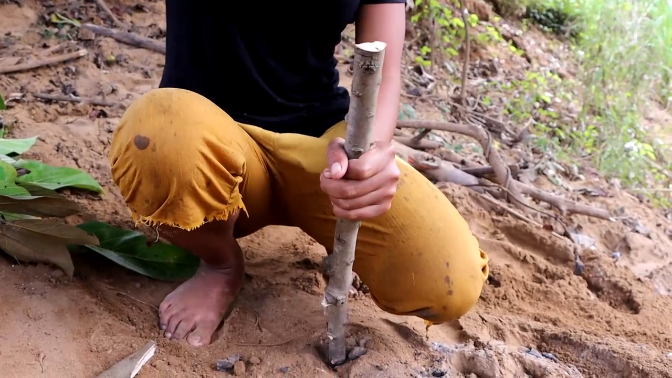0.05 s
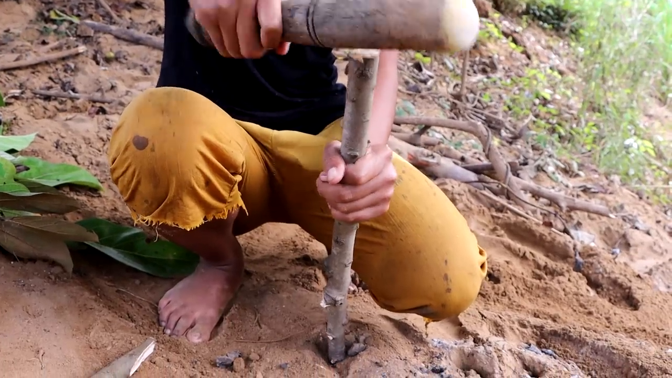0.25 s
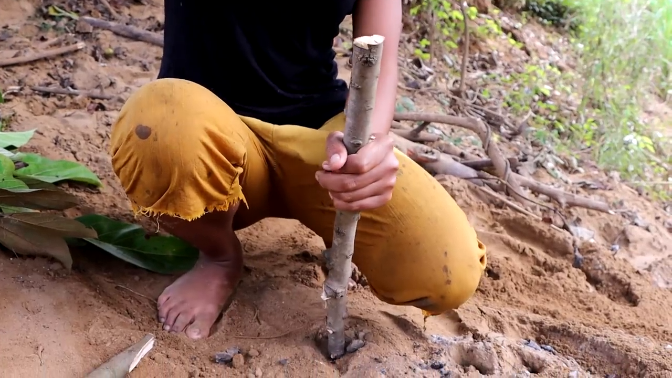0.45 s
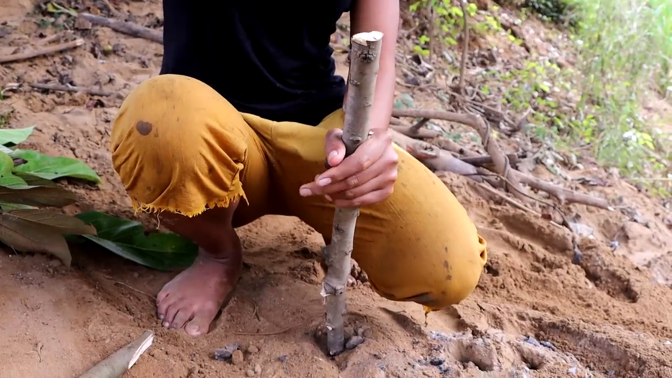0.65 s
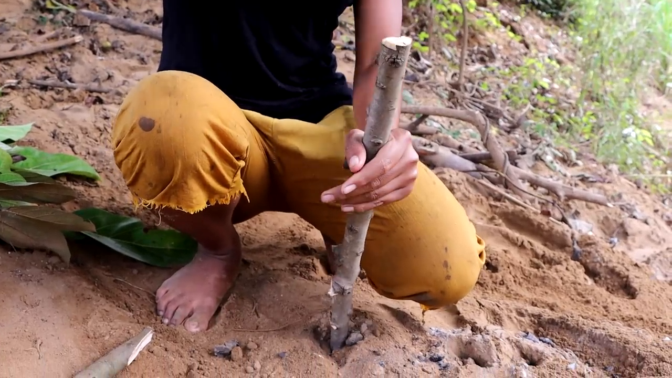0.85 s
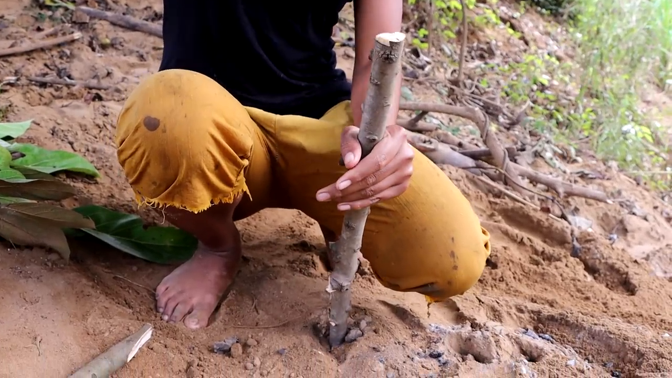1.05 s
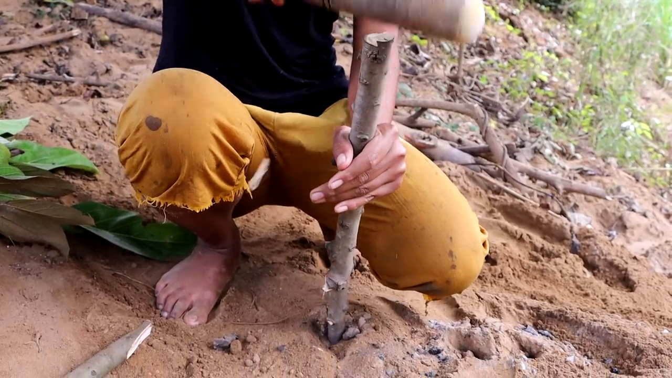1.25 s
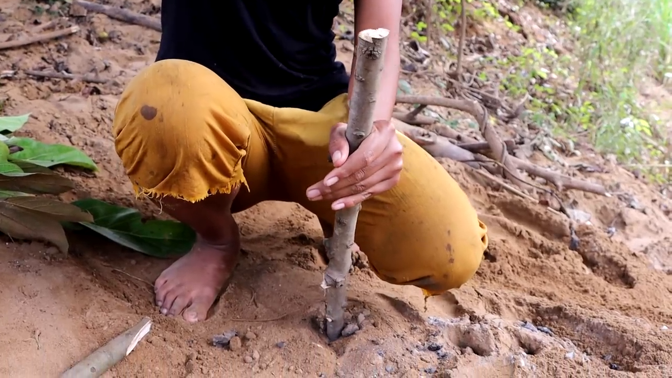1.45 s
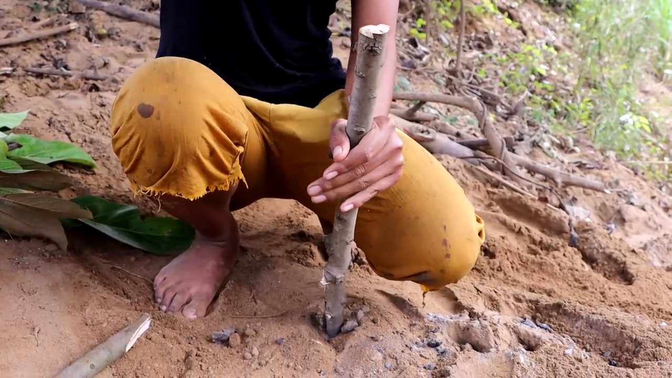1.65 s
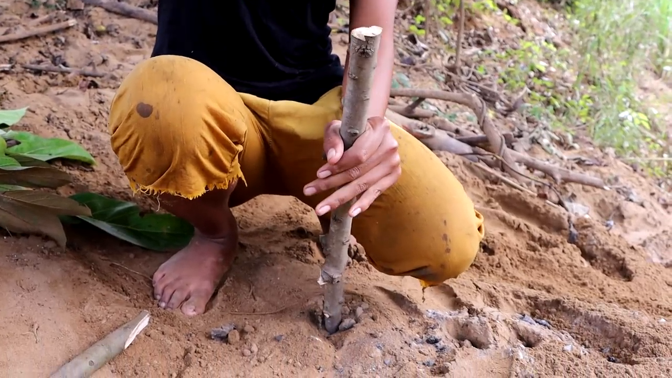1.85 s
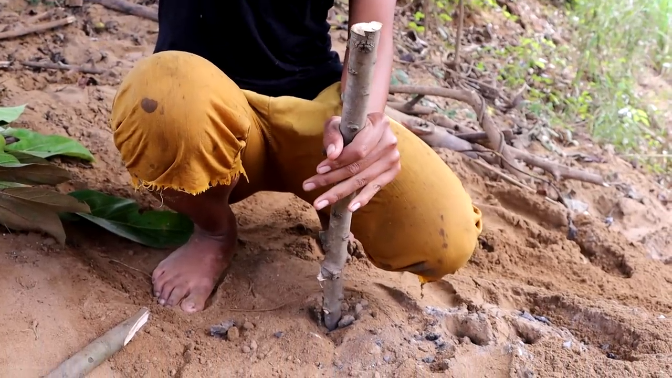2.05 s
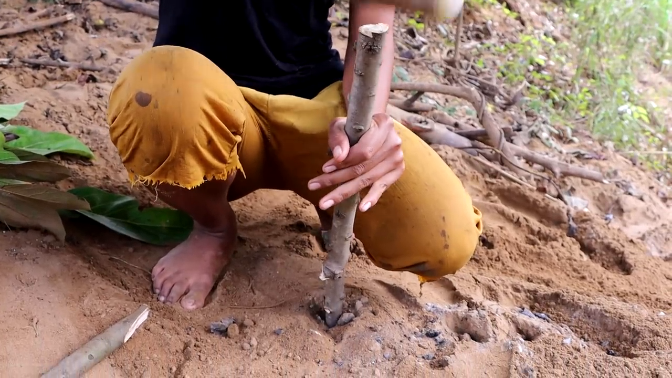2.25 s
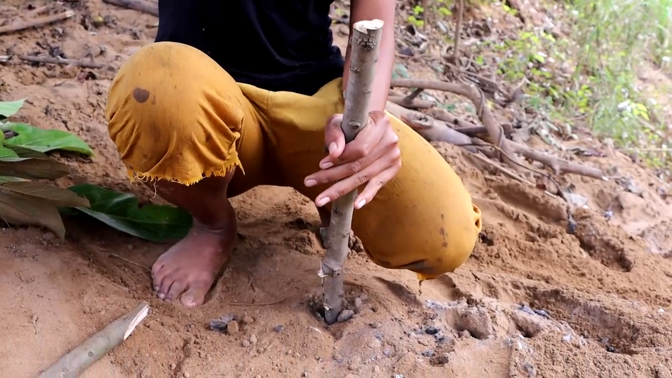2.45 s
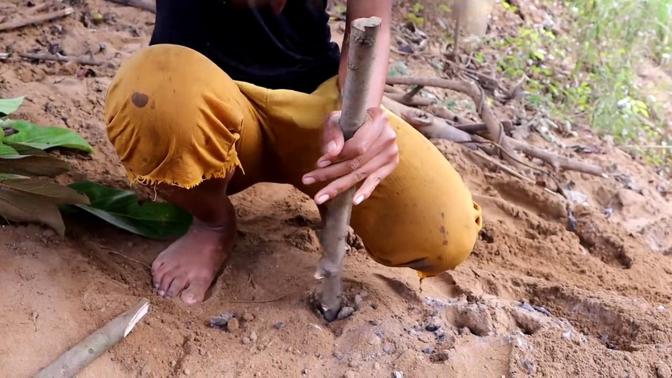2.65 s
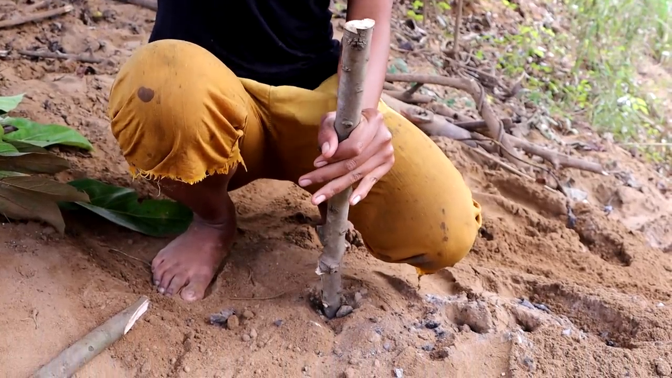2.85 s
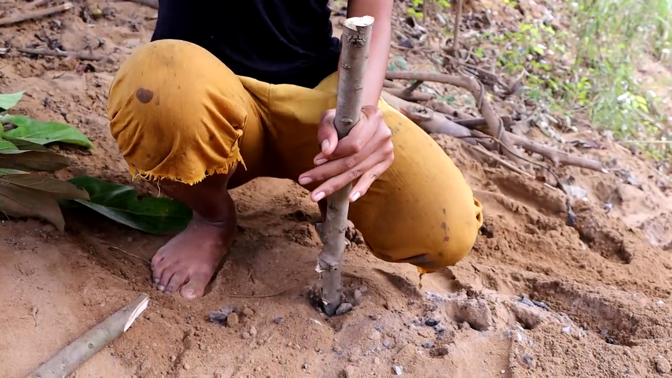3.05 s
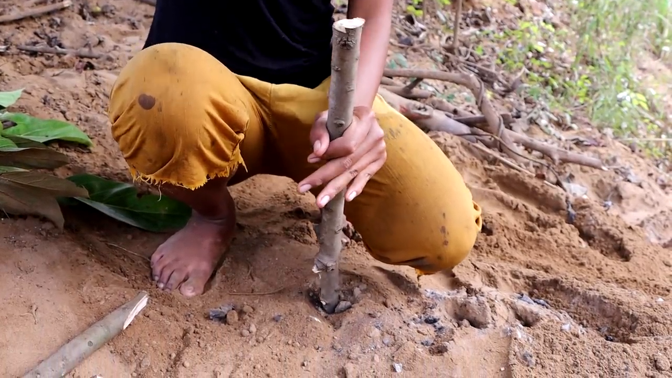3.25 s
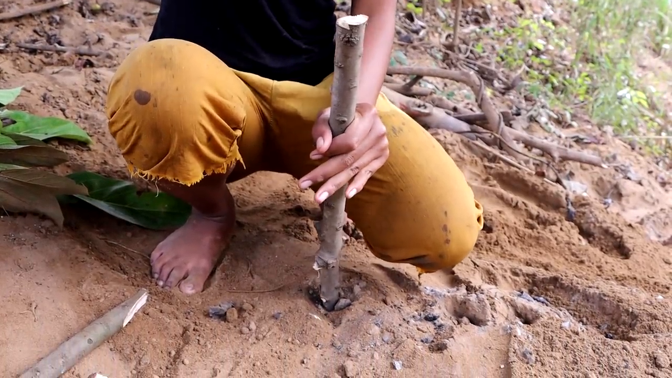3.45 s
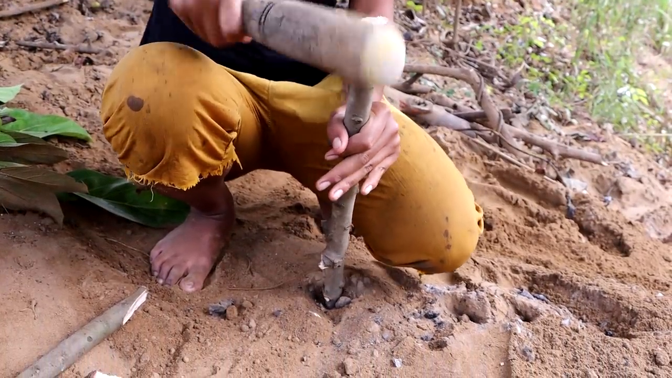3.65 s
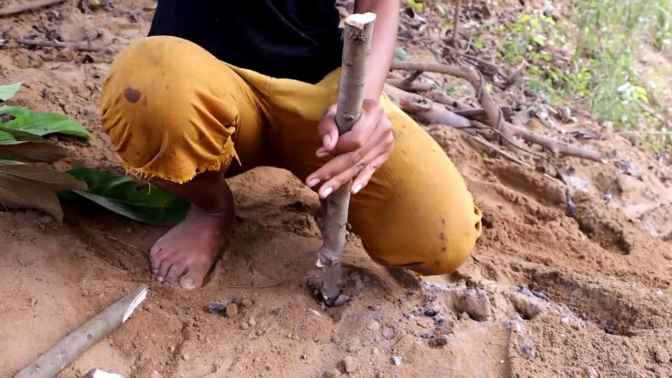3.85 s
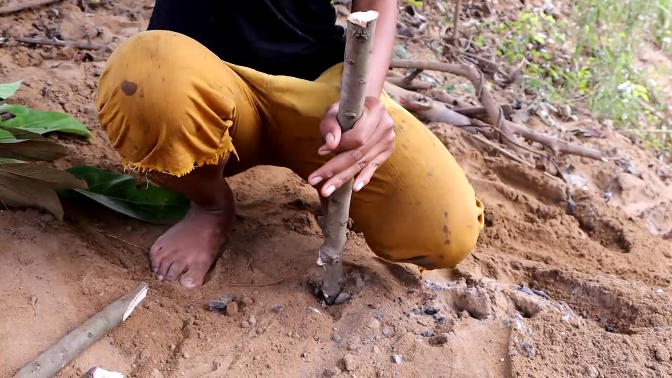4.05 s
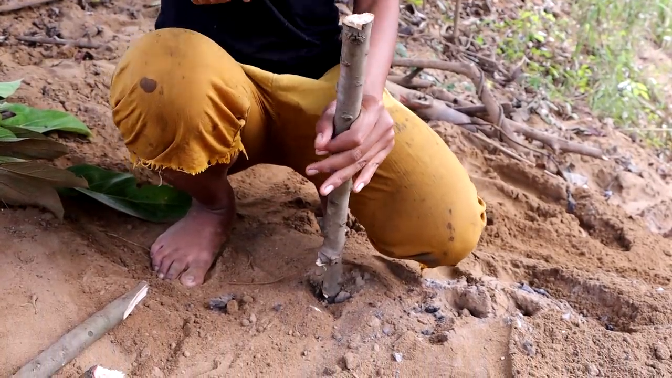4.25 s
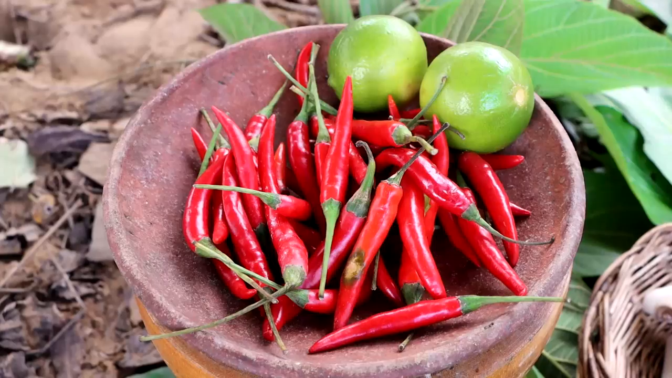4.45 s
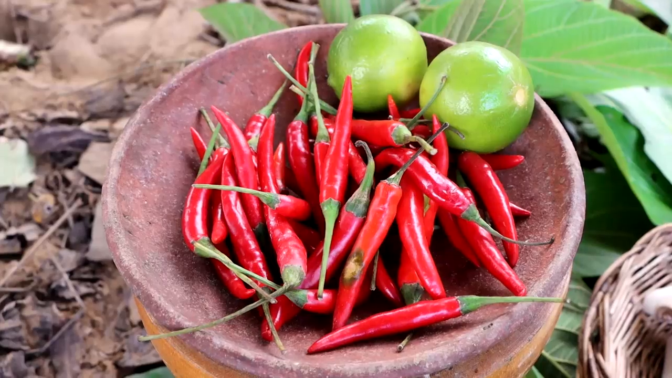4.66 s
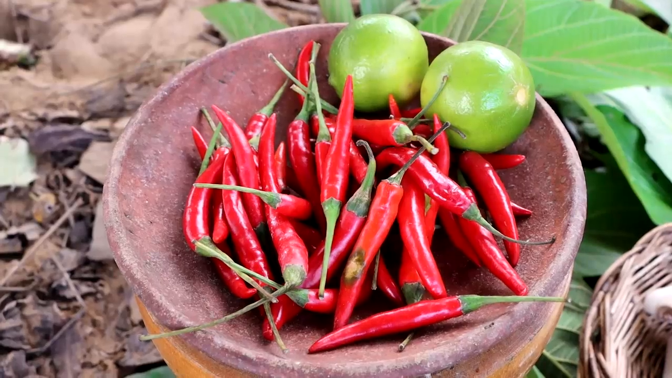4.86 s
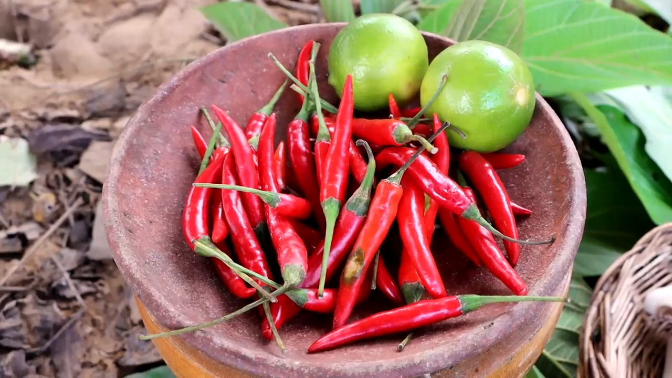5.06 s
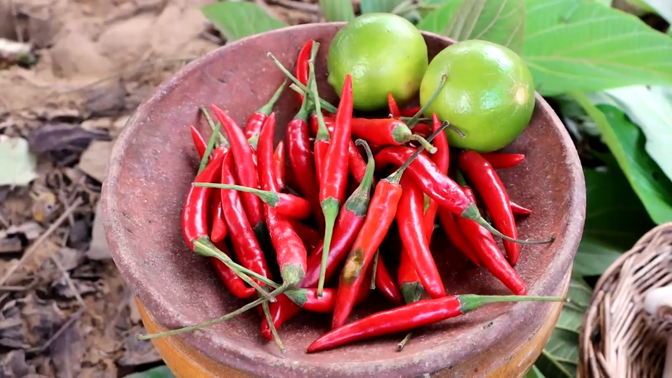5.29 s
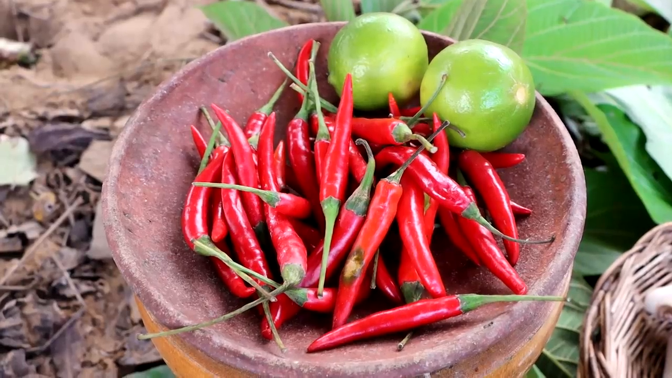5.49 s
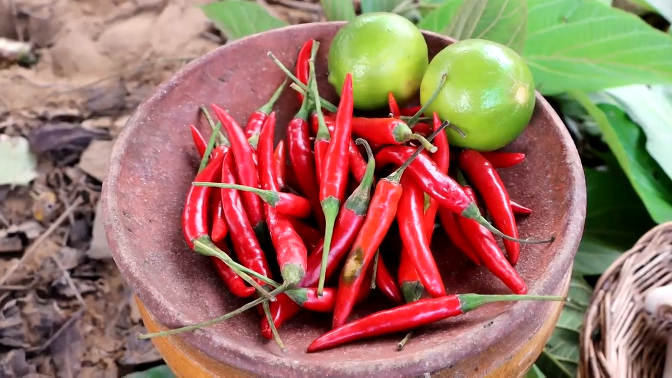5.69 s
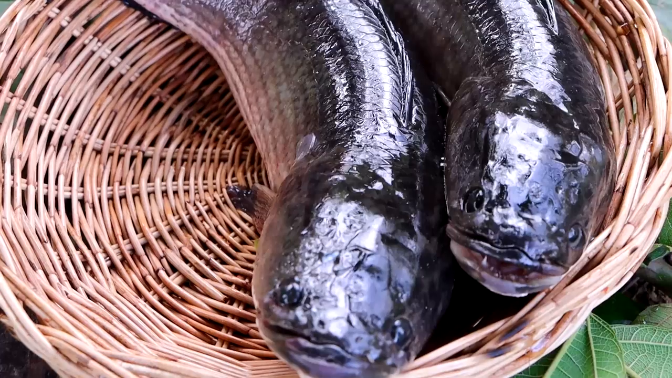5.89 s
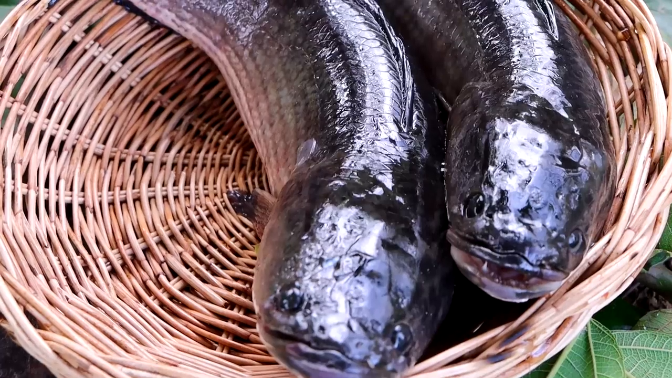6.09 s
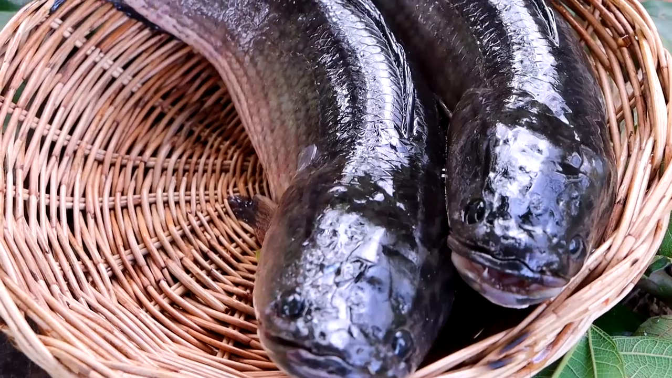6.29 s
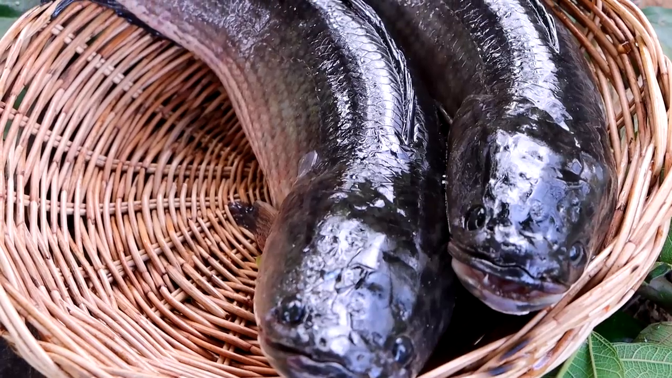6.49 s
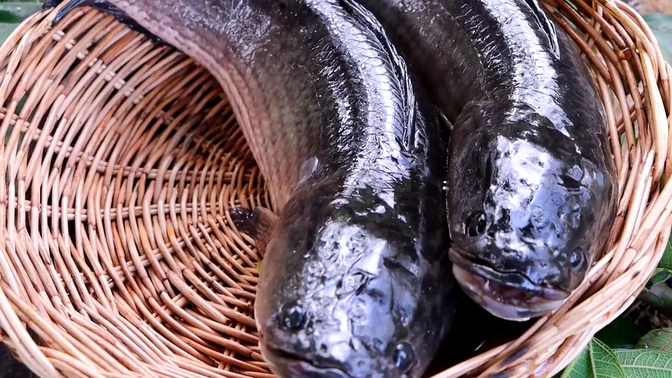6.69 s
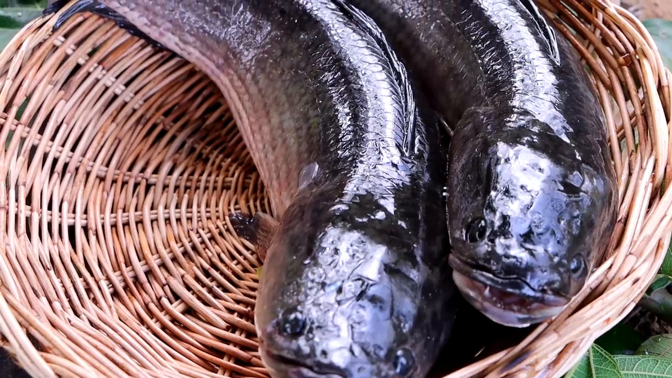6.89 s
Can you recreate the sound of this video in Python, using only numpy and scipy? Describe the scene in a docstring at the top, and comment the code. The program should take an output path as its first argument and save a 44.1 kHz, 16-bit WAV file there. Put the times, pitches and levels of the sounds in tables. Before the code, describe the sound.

Close, overloaded club-on-wood blows about twice a second outdoors, with cricket and cicadas behind; brief rustling and bumps, a short gap, two firmer thuds.

```python
"""Driving a stake at a forest edge

A wooden club drives a hand-held stake into soft ground, and the close knocks overload the microphone.
Struck wood and soil are dying sine tones; the crack of bark and the echoes are shaped noise.
Cicadas, a cricket and a far bird sound behind. The background changes, leaves rustle and things are bumped.
After a short silence two duller blows fall on a stake that sits firmly in the soil."""
import sys
import numpy as np
from scipy import signal
from scipy.fft import rfft, irfft, next_fast_len
from scipy.io import wavfile
from scipy.ndimage import uniform_filter1d, map_coordinates

SR = 44100
rng = np.random.default_rng(int(sys.argv[2]) if len(sys.argv) > 2 else 0)


def wrap_up_sound(samples):
    """Save the sound to the file named by the first command line argument, as 16-bit audio."""
    columns = np.atleast_2d(samples).T
    # keep every value between -1 and 1, then stretch to whole-number steps
    tamed = np.clip(columns, -1, 1)
    steps = np.round(tamed * 32767).astype(np.int16)
    wavfile.write(sys.argv[1], SR, steps)


N = 305613
TIME = np.arange(N) / SR  # seconds
BLOW_TIME = np.arange(SR // 4) / SR  # seconds since one blow or bump

# outdoor air before the background changes, up to the end of the silence, and after it: f/Hz, level/dB per Hz
FIRST_AIR = [(15, -39), (25, -10), (90, -7.5), (220, -5), (500, -9), (800, -6), (1500, -6.5), (2500, -8.5),
             (3600, -15), (6000, -16.5), (9000, -21.5), (12000, -22), (14000, -39.5), (16000, -49.5)]
MIDDLE_AIR = [(15, -36), (25, -10), (90, 1.5), (250, -4), (550, -8), (1200, -6), (2500, -8.5), (4500, -14),
              (7000, -19), (12500, -19.5), (14500, -36), (16000, -31)]
LAST_AIR = [(15, -35), (25, -11.5), (100, -0.5), (500, -4), (1100, -1.5), (2200, -1.5), (3500, -8),
            (5700, -12), (8400, -15), (12500, -17), (14000, -46), (16000, -67)]
# how alike left and right are: f/Hz, likeness (0 to 1)
LIKENESS = [(60, 0.95), (180, .85), (550, 0.7), (1650, 0.35), (5000, 0.058), (15000, .05)]
# the far bird's phrases: t/s, length/s, first f/Hz, last f/Hz, level/dB relative to each other
BIRD_PHRASES = [(0, 0.16, 4090, 4360, -78), (0.124, 0.045, 4240, 3840, -71.5), (.25, 0.5, 3980, 4250, -77),
                (0.863, 0.3, 4220, 3730, -77), (1.285, 0.14, 4020, 4000, -79),
                (4.2, 0.072, 4890, 4300, -69), (4.361, 0.084, 4610, 4560, -72),
                (5.352, .12, 4464, 4360, -77), (5.616, .1, 4210, 4000, -75)]
# hiss of brushing leaves: f/Hz, level/dB per Hz, relative
LEAF_HISS = [(180, -43.5), (300, -7), (440, -9), (667, -16), (1430, -10), (4670, -4), (6000, -10.5),
             (10700, -14.5), (13800, -20), (16000, -39)]
# light bumps and twig ticks: t/s, level/dB, centre f/Hz
BUMPS = [(3.762, -51, 9580), (4.535, -44, 3237), (4.633, -40, 604), (4.809, -36.5, 446), (4.894, -32, 1000),
         (5.539, -55.5, 132), (5.676, -49, 104.4), (5.807, -51, 121), (6.41, -52.5, 480)]
# scatter from the undergrowth around each stake, and from the farther trees: f/Hz, relative level/dB
LOOSE_STAKE_ECHO = [(60, -2.5), (130, -2.5), (250, 0), (600, -6), (1100, -9.5), (1700, 1.5), (2800, -1),
                    (4500, -1), (8000, -2), (15000, -4)]
FIRM_STAKE_ECHO = [(60, -4), (130, 5.5), (250, -2.5), (600, -1), (1000, -11), (1300, 12.5), (1650, 6),
                   (2800, -6), (4500, -1), (8000, 6.5), (15000, -2.5)]
FAR_TREES_ECHO = [(60, 7.5), (100, 9.5), (180, 0.5), (450, -6.5), (800, -7), (1150, -3.5), (1800, -2),
                  (2850, 9.5), (4500, 1.5), (8000, -4.5), (15000, -5)]
# bark crushed under the club: f/Hz, level/dB per Hz, relative
BARK_CRACK = [(300, 0.5), (1500, 6.5), (3500, -0.5), (5500, -7.5), (8000, -9), (11000, -17), (16000, -20.5)]
# blows on the loose, then the firm stake: t/s, force level/dB, ground thud level/dB, off-centre level/dB,
# club ring level/dB, soil pitch factor
LOOSE_BLOWS = [(.2834, -8.5, -4.5, 0.5, -11, 1.26), (.7536, 3, -6.5, 7, -10, 1.0),
               (1.2309, -4, -2.5, 0.5, 4.5, 0.97), (1.7157, -2, -3, -4, 3.5, 0.98),
               (2.2098, -2.5, -2, 3.5, 11.5, 0.97), (2.7080, -1.5, -2, 3, -1.5, 0.89),
               (3.1747, -2.5, -1, 3, 10, .98), (3.6548, -10, -0.5, -19, -22, 1.05),
               (4.1505, -3.5, -2, -9, 6, 1.03)]
FIRM_BLOWS = [(6.2314, -0.84, .58, 6, -8, 0.907), (6.7450, 1.7, .85, -10.5, 5, 0.92)]
# tones of struck things, before each blow's pitch, length and level factors:
# f/Hz, level/dB, time to fall 60 dB/s, response to an off-centre blow (0 to 1)
# an out-of-round stick bends at two close pitches
LOOSE_STAKE_TONES = [(495, -9.5, 0.022, 0), (723, -4.5, 0.014, 0.1), (1100, 3, 0.019, 0.18),
                     (1271.4, -7, .03, 0.92), (1624, -13, 0.017, 0.1), (3530, -19.5, 0.0025, 1),
                     (4260, -23.5, 0.0099, 0.6), (5200, -34.5, .011, 0.4)]
FIRM_STAKE_TONES = [(430, -45, 0.022, 0.083), (600, -3, 0.0067, 0.055), (908, -6.5, 0.02, 0),
                    (1133, -15, 0.03, 0.084), (1333, -16.5, 0.024, 0.58), (1635, -23, 0.013, 0.51)]
LOOSE_CLUB_TONES = [(2420, -16.5, 0.0083, 0), (2770, -11.5, 0.007, 0), (3030, -19.5, 0.013, 0),
                    (2700, -54, 0.25, 0)]
FIRM_CLUB_TONES = [(1288, -47, 0.17, 0), (1334, -35.5, 0.057, 0), (2654, -20.5, 0.018, 0),
                   (3070, -24.5, 0.024, 0)]
LOOSE_GROUND_TONES = [(111, -16.5, 0.052, 0), (225, -10, 0.028, 0), (295, -10.5, .024, 0)]
FIRM_GROUND_TONES = [(145, -19, 0.06, 0), (207, -8.5, 0.029, 0), (87.4, -31.5, 0.22, 0)]

CHANGE_S, SILENCE_S, RESUME_S = 4.44, 5.822, 5.872  # background changes; silence starts; sound resumes
FIRST_AIR_DB, MIDDLE_AIR_DB, LAST_AIR_DB = -65.5, -60, -61
CHIRP_PERIOD_S, FIRST_CHIRP_S, CHIRP_S = .25, .027, .17  # spacing, middle of the first chirp, length
CHIRP_PULSE_HZ, CHIRP_PULSE_DEPTH = 17, .5  # throb of the cricket
NOTE_S = .115  # rough length of a bird note; a whole number of notes fills a phrase
NOTE_SLIDE_HZ, NOTE_LEAP_HZ = 159, 60  # downward slide in a note, random scatter between notes
RUSTLE_START_S, RUSTLE_PEAK_S, RUSTLE_DB = 4.535, 4.74, -48  # one sweep through the leaves
RUSTLE_RISE_DB_PER_S, RUSTLE_FALL_DB_PER_S = 51, 130
SHAKE_DB, SHAKE_FALL_DB_PER_S = -17, 232  # leaves shaken by a bump: level against the bump, and its fall
BUMP_OCTAVES = 0.7  # sets how widely a bump spreads in pitch
BUMP_T60_S, BUMP_T60_SLOPE = 0.059, -0.23  # ring time at 1 kHz, and its power of pitch: low bumps last longer
CRACK_PER_FORCE = 0.55  # dB of crack per dB of force: harder blows crush more bark
RING_PER_FORCE = -0.26  # dB of ring length per dB of force: the club stays pressed on and damps the stake
TREBLE_HZ, CUTOFF_HZ = 13000, 17000  # gentle softening, then a steep cut


def from_db(db):
    """Turn decibels into a plain multiplier."""
    return 10 ** (np.asarray(db) / 20)


def rms_one(x):
    """Scale a sound to an average strength (rms) of 1."""
    return x / np.sqrt(np.mean(x ** 2) + 1e-20)


def at_hz(points, hz):
    """Read a table between its points, with pitch spaced as the ear hears it (log scale)."""
    points = np.array(points)
    return np.interp(np.log(hz + 1), np.log(points[:, 0]), points[:, 1])


def add(out, s, sound):
    """Mix a sound in at time s."""
    start = max(round(s * SR), 0)
    out[:, start:start + sound.shape[-1]] += sound[..., :N - start]


def noise(shape_db, size):
    """Stereo noise of rms 1, shaped by shape_db(hz); the two sides are most alike in the bass."""
    length = next_fast_len(size)
    hz = np.fft.rfftfreq(length, 1 / SR)
    mid, side = rfft(rng.standard_normal((2, length)))
    alike = np.clip(at_hz(LIKENESS, hz), 0, .99)
    shared = np.sqrt(1 + alike) * mid
    opposed = np.sqrt(1 - alike) * side * [[1], [-1]]
    shaped = (shared + opposed) * from_db(shape_db(hz))
    return rms_one(irfft(shaped, length)[:, :size])


def coloured(spectrum, size=N):
    """Noise whose balance of bass and treble follows a table."""
    return noise(lambda hz: at_hz(spectrum, hz), size)


def narrow(centre_hz, width_hz):
    """Noise gathered around one pitch, as if passed twice through one resonance."""
    return noise(lambda hz: -20 * np.log10(1 + ((hz - centre_hz) / width_hz) ** 2), N)


def swell(start, length):
    """A rounded rise and fall in loudness."""
    across = 2 * (TIME - start) / length - 1  # runs from -1 to 1
    return np.sqrt(np.maximum(1 - across ** 2, 0))


def echo(x, spectrum, level_db, t60, build_s):
    """Many blurred reflections of a sound: they build up, then fall 60 dB in t60 seconds."""
    t = np.arange(SR * 3 // 4) / SR
    build_up = 1 - np.exp(-(t / build_s) ** 2)
    response = coloured(spectrum, size=len(t)) * from_db(-60 * t / t60) * build_up
    response = rms_one(response) / np.sqrt(len(t))
    return from_db(level_db) * signal.fftconvolve(x, response, axes=1)[:, :N]


def outdoor_air(first):
    """The broad, soft noise of open air, with a new tone in each of three stretches."""
    first_air = from_db(FIRST_AIR_DB) * coloured(FIRST_AIR)
    middle_air = from_db(MIDDLE_AIR_DB) * coloured(MIDDLE_AIR)
    last_air = from_db(LAST_AIR_DB) * coloured(LAST_AIR)
    return np.select([first, TIME < RESUME_S], [first_air, middle_air], last_air)


def insects(first, cricket_db, chorus_db, cicada_db):
    """A cricket chirps evenly on two close pitches over a cicada chorus; later one steady cicada stands out."""
    chirp_middles = np.arange(FIRST_CHIRP_S, CHANGE_S, CHIRP_PERIOD_S)
    chirping = sum(swell(s - CHIRP_S / 2, CHIRP_S) for s in chirp_middles)
    throb = 1 + CHIRP_PULSE_DEPTH * np.sin(2 * np.pi * CHIRP_PULSE_HZ * TIME)
    cricket = narrow(centre_hz=7160, width_hz=35) + from_db(-4) * narrow(centre_hz=7310, width_hz=40)
    chorus = narrow(centre_hz=6420, width_hz=230) + from_db(-7) * narrow(centre_hz=6700, width_hz=80)
    cicada = narrow(centre_hz=6450, width_hz=80) + from_db(-3) * narrow(centre_hz=6320, width_hz=200)
    cicadas = np.where(first, from_db(chorus_db) * chorus, from_db(cicada_db) * cicada)
    return from_db(cricket_db) * chirping * throb * cricket + cicadas


def bird(level_db):
    """Runs of wavering, down-slurred whistles (sine tones), heard mostly as scatter from the trees."""
    song = np.zeros((2, N))
    waver_hz = 70 * narrow(centre_hz=0, width_hz=60)[0]
    for s, length, first_hz, last_hz, db in BIRD_PHRASES:
        notes = max(round(length / NOTE_S), 1)
        # which note is sounding, and how far through it we are (0 to 1)
        note, through = np.divmod(np.interp(TIME, [s, s + length], [0, notes]), 1)
        leaps_hz = NOTE_LEAP_HZ * rng.standard_normal(size=16)[note.astype(int)]
        slide_hz = NOTE_SLIDE_HZ * (.5 - through)
        phrase_hz = np.interp(TIME, [s, s + length], [first_hz, last_hz])
        hz = phrase_hz + leaps_hz + slide_hz + waver_hz
        whistle = np.sin(2 * np.pi * np.cumsum(hz) / SR)
        song += from_db(db + level_db) * np.sqrt(np.sin(np.pi * through)) * whistle
    return .5 * song + echo(song, FAR_TREES_ECHO, level_db=2.0, t60=0.24, build_s=0.0058)


def leaf_motion():
    """The sweep through the leaves swells and fades; each bump near its peak shakes them afresh."""
    late = TIME - RUSTLE_PEAK_S
    sweep_db = RUSTLE_DB + np.minimum(RUSTLE_RISE_DB_PER_S * late, -RUSTLE_FALL_DB_PER_S * late)
    motion = (TIME > RUSTLE_START_S) * from_db(sweep_db)
    for s, db, _ in BUMPS:
        if abs(s - RUSTLE_PEAK_S) < .5:
            shake_db = db + SHAKE_DB - SHAKE_FALL_DB_PER_S * abs(TIME - s)
            motion = np.hypot(motion, (TIME > s) * from_db(shake_db))
    return motion


def rustle(grain_db, hollow_db, snaps_per_s, snap_db):
    """Leaves brush past each other in a grainy hiss, with tiny snaps and a faint hollow ring."""
    grains = rms_one(uniform_filter1d(rng.standard_normal(N), size=90))
    snap_starts = (rng.random(N) < snaps_per_s / SR) + 1e-18
    snaps = signal.lfilter([1], [1, -np.exp(-1 / (0.0025 * SR))], snap_starts)  # each fades over 2.5 ms
    loudness = from_db(grain_db * grains) + from_db(snap_db) * snaps
    hiss = rms_one(coloured(LEAF_HISS) * loudness)
    hollow = from_db(hollow_db) * narrow(centre_hz=668, width_hz=33)
    return leaf_motion() * (hiss + hollow)


def bumps():
    """Small damped contacts, each a short burst of noise around its own pitch."""
    out = np.zeros((2, N))
    for s, db, centre_hz in BUMPS:
        def shape_db(hz):
            """The burst weakens away from its centre pitch."""
            octaves = np.log2((hz + 1) / centre_hz)
            return -13 * np.log10(1 + (octaves / BUMP_OCTAVES) ** 4)
        burst = noise(shape_db, len(BLOW_TIME))
        t60 = BUMP_T60_S * (centre_hz / 1000) ** BUMP_T60_SLOPE
        add(out, s, burst * from_db(db - 60 * BLOW_TIME / t60))
    return out


def ring(tones, off_centre_db=0, pitch=1, length=1):
    """Struck wood or soil sounds several dying tones; neighbours swing in opposite directions."""
    out = np.zeros(len(BLOW_TIME))
    for k, (hz, db, t60, share) in enumerate(tones):
        level_db = db + share * off_centre_db - 60 * BLOW_TIME / (t60 * length)
        out += (-1) ** k * from_db(level_db) * np.sin(2 * np.pi * hz * pitch * BLOW_TIME)
    return out


def knocks(blows, stake, club, ground, pitch, ring_length, crack_level_db, crack_t60, soil_yield_s, low_cut_hz):
    """Each blow cracks bark and rings stake and club; the soil thuds as it yields, higher where it is stiffer."""
    out = np.zeros((2, N))
    yielding = 1 - np.exp(-BLOW_TIME / soil_yield_s)
    for s, force_db, thud_db, off_centre_db, club_db, soil_pitch in blows:
        length = ring_length * from_db(RING_PER_FORCE * force_db)
        stake_ring = from_db(force_db) * ring(stake, off_centre_db, pitch, length)
        club_ring = from_db(club_db) * ring(club)
        crack_db = crack_level_db + CRACK_PER_FORCE * force_db - 60 * BLOW_TIME / crack_t60
        crack = coloured(BARK_CRACK, size=len(BLOW_TIME)) * from_db(crack_db)
        thud = from_db(thud_db) * yielding * ring(ground, pitch=soil_pitch)
        add(out, s, stake_ring + club_ring + crack - thud)
    # so small a source radiates little deep bass
    low_cut = signal.butter(2, low_cut_hz, "high", fs=SR, output="sos")
    return signal.sosfilt(low_cut, out + 1e-18)


def placed(x, lag_ms, pan_db):
    """Shift knocks sideways: the left side comes lag_ms later and pan_db louder (softer if negative)."""
    left = map_coordinates(x[0], [np.arange(N) - lag_ms * SR / 1000], order=3)
    return np.array([left * from_db(pan_db), x[1]])


def scene():
    """The forest behind, small handling sounds, and the knocks with their echoes."""
    first = TIME < CHANGE_S
    forest = outdoor_air(first) + bird(level_db=2.0)
    forest += insects(first, cricket_db=-76.0, chorus_db=-73.5, cicada_db=-72.0)
    handling = bumps() + rustle(grain_db=0.5, hollow_db=-16.0, snaps_per_s=99, snap_db=2.5)

    loose = knocks(LOOSE_BLOWS, LOOSE_STAKE_TONES, LOOSE_CLUB_TONES, LOOSE_GROUND_TONES,
                   pitch=1.0042, ring_length=1.013, crack_level_db=-11.0, crack_t60=0.019,
                   soil_yield_s=0.0037, low_cut_hz=41)
    firm = knocks(FIRM_BLOWS, FIRM_STAKE_TONES, FIRM_CLUB_TONES, FIRM_GROUND_TONES,
                  pitch=0.943, ring_length=0.9, crack_level_db=-18.0, crack_t60=0.014,
                  soil_yield_s=0.0031, low_cut_hz=110)
    echoes = echo(loose, LOOSE_STAKE_ECHO, level_db=-22.0, t60=0.14, build_s=0.017)
    echoes += echo(firm, FIRM_STAKE_ECHO, level_db=-15.0, t60=0.16, build_s=0.0067)
    echoes += echo(loose + firm, FAR_TREES_ECHO, level_db=-38.5, t60=.24, build_s=0.031)
    echoes += echo(loose, FAR_TREES_ECHO, level_db=-46.0, t60=0.38, build_s=.09)  # from deeper in the forest
    direct = placed(loose, lag_ms=.04, pan_db=.8) + placed(firm, lag_ms=.04, pan_db=-.1)
    return direct + echoes + forest + handling


def record(dry):
    """Loud peaks are cut flat, at a higher level after the short silence; the treble is softened and cut."""
    ceiling = np.where(TIME < RESUME_S, .63, .85)
    live = (TIME < SILENCE_S) | (TIME > RESUME_S)
    flattened = np.clip(dry, -ceiling, ceiling) * live
    soft = signal.sosfilt(signal.butter(3, TREBLE_HZ, fs=SR, output="sos"), flattened)
    return signal.sosfilt(signal.cheby2(16, 60, CUTOFF_HZ, fs=SR, output="sos"), soft)


dry = scene()
out = record(dry)
wrap_up_sound(out)
```